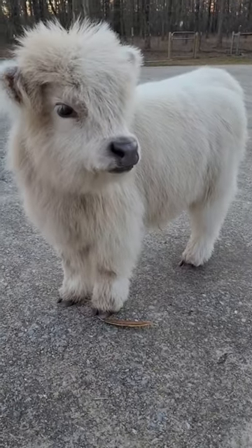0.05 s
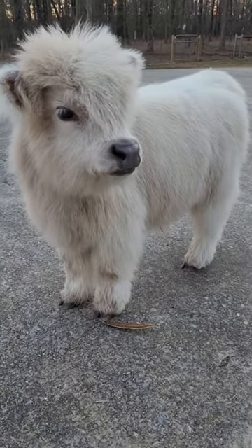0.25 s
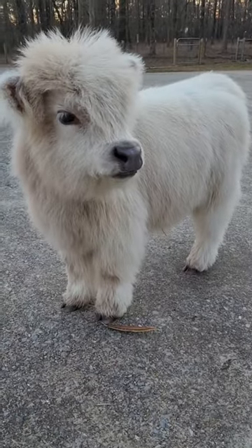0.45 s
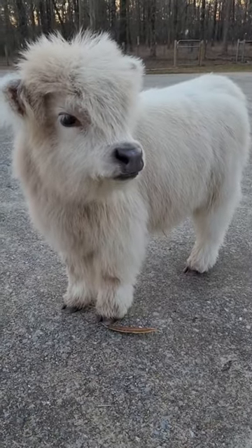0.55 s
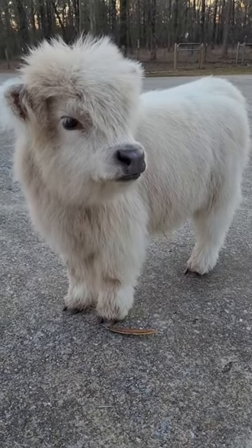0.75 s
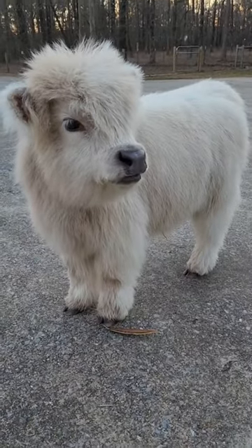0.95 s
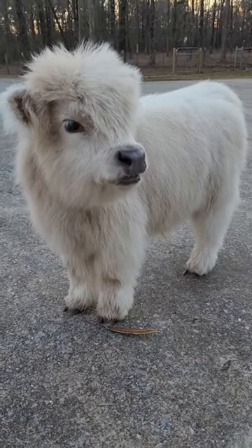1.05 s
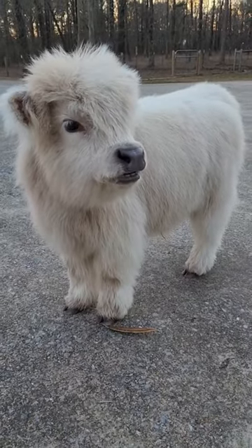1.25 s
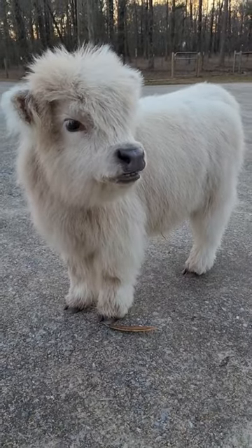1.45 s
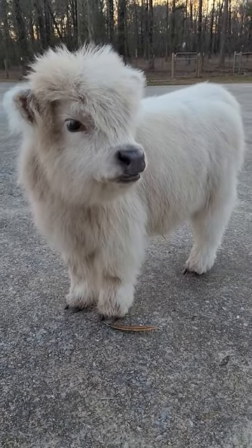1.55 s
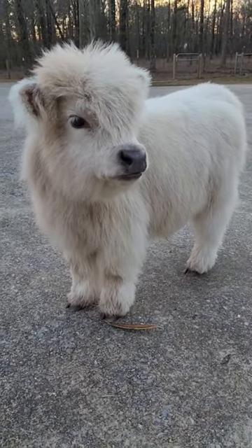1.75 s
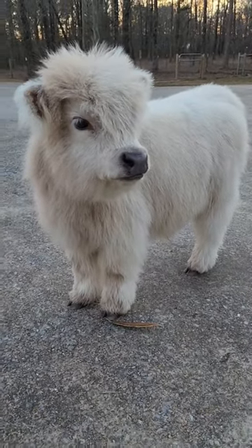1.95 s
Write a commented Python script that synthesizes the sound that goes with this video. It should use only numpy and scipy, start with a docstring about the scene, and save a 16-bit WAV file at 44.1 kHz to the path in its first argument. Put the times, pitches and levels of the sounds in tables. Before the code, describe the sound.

A calf moos once, close to the microphone, in a paved yard by a wood. A rising nasal hum opens into a louder, bright bleat, then drops in pitch and stops, leaving a faint low outdoor rumble.

```python
"""A paved yard at the edge of a wood, where a calf moos once, close by.
Its vocal folds send pulses through the throat: first a rising hum through the nose, then the lips part,
the mouth opens to a bright bleat, and the folds slacken into a slowing rattle. Ground and trees echo it.
Under it lie a low rumble and faint outdoor air; one tiny tick follows."""
import sys
import numpy as np
from scipy import signal
from scipy.fft import rfft, irfft, next_fast_len
from scipy.io import wavfile
from scipy.ndimage import map_coordinates

SR = 44100
rng = np.random.default_rng(int(sys.argv[2]) if len(sys.argv) > 2 else 0)


def digitize_waveform(pressure):
    """Quantize a signal to 16-bit integers and store it at the path in sys.argv[1].

    Rows of a 2-D input are taken as channels; values are limited to [-1, 1].
    """
    field = np.atleast_2d(pressure).T
    bounded = np.clip(field, -1, 1)
    quanta = np.round(bounded * 32767).astype(np.int16)
    wavfile.write(sys.argv[1], SR, quanta)


N = 88200
SIZE = 2048  # samples in the sound of one pulse

# how fast the vocal folds open and close: t/s, f/Hz
FOLD_RATE = [(0.0, 119.8), (0.028, 121.1), (0.35, 143.8), (0.452, 150.3), (0.662, 157.2), (0.698, 158.3),
             (0.81, 163.3), (0.904, 164.4), (1.02, 163.8), (1.14, 163.6), (1.234, 159.3), (1.262, 155.7),
             (1.3, 149.8)]
SLACK_S, END_S = FOLD_RATE[-1][0], 1.405  # the folds go slack, then stop


def amp(db):
    """Turn decibels into a number to multiply by."""
    return 10 ** (np.asarray(db) / 20)


def unit(x):
    """Scale a sound to an average power of 1."""
    return x / np.sqrt(np.mean(x ** 2) + 1e-20)


def along(points, hz):
    """Read between (frequency, value) points, with octaves evenly spaced."""
    freqs, values = np.transpose(points)
    return np.interp(np.log(hz + 1), np.log(freqs + 1), values)


def at(rows, t):
    """Read each column of a curve at the times t."""
    times, *columns = np.transpose(rows)
    return [np.interp(t, times, column) for column in columns]


def filtered(x, response):
    """Multiply each frequency in x by response(hz)."""
    size = next_fast_len(N + SR // 2)
    return irfft(rfft(x, size) * response(np.fft.rfftfreq(size, 1 / SR)), size)[:N]


def noise(colour):
    """Steady noise of power 1, shaped by (frequency, level) points."""
    return unit(filtered(rng.standard_normal(N), lambda hz: amp(along(colour, hz))))


def delay(hz, seconds):
    """A filter that makes a sound arrive later."""
    return np.exp(-2j * np.pi * hz * seconds)


def causal(gain):
    """Turn rows of gains into filters that ring only after a pulse (minimum phase)."""
    cepstrum = irfft(np.log(np.maximum(gain, 1e-6)))
    cepstrum[:, 1:SIZE // 2] *= 2
    cepstrum[:, SIZE // 2 + 1:] = 0
    return np.exp(rfft(cepstrum))


def ring(hz, centre, width, db):
    """The boost in dB from a resonance: air that rings around one frequency."""
    return 10 * np.log10(1 + (amp(db) ** 2 - 1) / (1 + (2 * (hz - centre) / width) ** 2))


def fold_pitch(t):
    """The rate of the vocal folds in Hz; it sags once they go slack."""
    sag_hz_per_s = 880
    return np.maximum(at(FOLD_RATE, t)[0] - sag_hz_per_s * np.maximum(t - SLACK_S, 0), 50)


def moo(t):
    """Each time the vocal folds close, they send a pulse and a puff of breath through the throat."""
    # how hard the calf calls: t/s, relative level/dB
    effort = [(0.0, -40.5), (0.324, -31), (0.596, -28.5), (0.682, -33.5), (0.788, -28), (0.816, -21),
              (0.922, -18), (1.212, -19), (1.318, -20), (1.374, -33), (1.41, -47.5)]
    # hoarseness: t/s, breath level against the pulse/dB, timing scatter/ms
    roughness = [(0, -15, .02), (.3, -16, .012), (.6, -19, .006), (.9, -23, .003), (1.12, -22, .004),
                 (1.22, -19, .01), (1.3, -15, .025), (1.4, -6, .2)]
    # colour of the breath: f/Hz, level/dB
    breath_colour = [(150, -13), (600, -7), (1500, 0), (3000, 2), (9000, 6)]
    voice_db, shimmer_db, puff_decay_s = -0.5, .2, .004
    lead = 192  # samples of room before each pulse for its soft start
    hz = np.fft.rfftfreq(SIZE, 1 / SR)
    pitch = fold_pitch(t)
    cycles = np.cumsum(pitch) / SR
    times = np.interp(np.arange(1, cycles[-1]), cycles, t)  # one pulse per cycle
    times = times[times < END_S]
    chance = rng.standard_normal((300, SIZE + 2))[:len(times)]
    jitter, shimmer, hiss = chance[:, 0], chance[:, 1], chance[:, 2:]
    breath_db, jitter_ms = at(roughness, times)
    starts = np.maximum(times + jitter_ms * jitter / 1000, 0) * SR
    pulses = -delay(hz, (starts % 1)[:, None] / SR)  # a pulse can fall between two samples
    fade = np.exp(-t[:SIZE] / puff_decay_s)
    puffs = rfft(hiss * fade / np.linalg.norm(fade)) * amp(breath_db[:, None] + along(breath_colour, hz))
    strength = amp(at(effort, times)[0] + voice_db + shimmer_db * shimmer)
    strength *= np.sqrt(SR / np.interp(times, t, pitch))  # equal power at any pitch
    spectra = (pulses + puffs) * delay(hz, lead / SR) * throat(times, hz) * head_cavities(times, hz)
    waves = irfft(spectra) * strength[:, None]
    places = starts.astype(int)[:, None] + np.arange(SIZE)
    return np.bincount(places.ravel(), waves.ravel(), N + lead)[lead:N + lead]  # add up the pulses


def throat(times, hz):
    """Throat and mouth colour each pulse as they move from one shape to the next."""
    # colour of each mouth shape: f/Hz, relative level/dB
    nose = [(150, -18), (240, -20.5), (310, -16), (420, -14), (600, -3.5), (800, -6.5), (1200, -14),
            (1540, -16.5), (1690, -9), (1980, -33), (2430, -13), (2700, -19.5), (3150, -2.5), (3550, -12.5),
            (3900, -20.5), (4950, -23), (5350, -58.5), (5750, -33.5), (6300, -34.5), (7050, -20.5),
            (7500, -25.5), (8500, -24), (9300, -34.5), (11000, -55)]
    parting = [(76, -26), (130, 2.5), (167, 3), (308, -13), (482, 0.5), (631, -15), (826, -10.5),
               (1180, -26), (1630, -13), (1790, -4), (2100, -34.5), (3230, -4.5), (3870, -16.5),
               (4630, -18), (5250, -34.5), (7130, -30.5), (9500, -33.5), (12400, -60.5), (20900, -120)]
    parted = [(76, -24), (130, 0), (322, -7), (481, -25), (667, -6.5), (892, -30), (1330, 0), (1540, -9),
              (1910, -45), (2340, -16), (2800, -22), (3300, -8), (4660, -38), (5200, -39.5), (6120, -38),
              (7080, -28), (10000, -45.5), (13000, -77.5), (22000, -120)]
    half_open = [(76, -29.5), (130, -6), (337, 1), (491, -23.5), (812, -13), (1060, -14.5), (1230, 5.5),
                 (1340, -0.5), (1690, 6), (1920, -24), (2260, 6.5), (2750, -20.5), (3290, -4),
                 (3800, -32.5), (4310, -9.5), (4980, -34), (6520, -15.5), (7130, -41.5), (9500, -35.5),
                 (12400, -80.5), (20900, -120)]
    wide_open = [(160, 4.5), (330, 0), (500, -0.5), (660, 2), (850, -11), (1150, -7.5), (1600, -6),
                 (2300, -6), (3000, -12.5), (3500, -20), (3850, -13.5), (5000, -15), (6300, -13.5),
                 (7300, -14), (8500, -19), (9500, -41.5)]
    closing = [(150, -15.5), (300, -10), (600, -5), (850, -14.5), (1500, -2.5), (2300, -9.5), (3400, -12),
               (4300, -12.5), (5100, -18.5), (6400, -15.5), (8000, -23), (9500, -38)]
    # sharp peaks and dips of three of the shapes: f/Hz, width/Hz, boost/dB
    nose_rings = [(1582, 110, 14), (2935, 360, -8)]
    open_rings = [(1279, 40, 22.5), (1769, 77, 12.5), (2581, 42, 23.5), (3121, 25, 21.5), (4170, 250, 15),
                  (5510, 240, 8), (6900, 70, 10.5)]
    closing_rings = [(449.5, 51, 20.2), (1285.7, 90, 4.8), (1800, 200, 6.3), (2650, 170, 16),
                     (4620, 530, 8)]
    # lips loosen, lips part, mouth half opens, opens wide, closes: midpoint t/s, length/s
    moves = [(0.659, 0.04), (0.696, 0.066), (0.8, 0.015), (0.851, 0.1), (1.238, 0.16)]
    shapes = [(nose, nose_rings), (parting, []), (parted, []), (half_open, []),
              (wide_open, open_rings), (closing, closing_rings)]
    colours = [along(base, hz) + sum(ring(hz, *row) for row in rings) for base, rings in shapes]
    t, db = times[:, None], colours[0]
    for (midpoint, length), colour in zip(moves, colours[1:]):
        progress = np.clip((t - midpoint) / length + .5, 0, 1)
        db = db + progress * (colour - db)
    # as the lips part, a resonance slides down with a dip below it
    slide_s, slide_length_s, slide_hz_per_s = .68, .025, 7500
    slide = np.exp(-((t - slide_s) / slide_length_s) ** 2)
    centre_hz = 1730 - slide_hz_per_s * (t - slide_s)
    db += ring(hz, centre_hz, width=140, db=11 * slide)
    db -= ring(hz, centre_hz - 480, width=160, db=11 * slide)
    # slack folds close softly, so the treble fades first
    dull_db_per_s = 67.5 * np.log2(1 + hz / 2050)
    db -= dull_db_per_s * np.maximum(t - SLACK_S, 0)
    bass_cut_hz = 250
    gain = amp(np.maximum(db, -70)) / np.sqrt(1 + (bass_cut_hz / (hz + 1)) ** 12)
    power = np.mean(gain ** 2 * (hz > bass_cut_hz), axis=1, keepdims=True)
    return causal(gain / np.sqrt(power))  # every shape is equally strong


def head_cavities(times, hz):
    """Side cavities of the head spread each pulse in time and put ripples in its colour."""
    # scatter of travel time through the head: f/Hz, typical delay/ms
    smear = [(100, -2.5), (600, 1.8), (1300, 2), (2400, 5.5), (4500, 2.7), (9000, 2.7)]
    # how much the colour wavers: f/Hz, depth/dB
    waver = [(300, 4.95), (1500, 0.97), (4000, 2.5), (9000, 5)]
    step_hz, step_s = 260.1, 0.08995  # spacing of the random grid
    grid = rng.standard_normal((120, 400))
    scatter = np.abs(map_coordinates(grid[-1], [hz / step_hz], mode="mirror"))
    delay_s = along(smear, hz) * scatter / 1000
    spread = np.exp(-2j * np.pi * np.cumsum(delay_s) * hz[1])
    places = np.meshgrid(times / step_s, hz / step_hz, indexing="ij")
    ripple = map_coordinates(grid, places, mode="mirror")
    return causal(amp(along(waver, hz) * ripple)) * spread


def chest(t):
    """Chest and throat give off a soft, clean tone at the pitch of the voice."""
    # strength of the tone: t/s, level/dB
    loudness = [(0, -40.5), (.2, -42.5), (.33, -37), (.56, -33.5), (.76, -32.5), (.88, -38.5),
                (1.24, -38.5), (1.32, -43.5), (1.38, -77)]
    tone = unit(-np.cos(2 * np.pi * np.cumsum(fold_pitch(t)) / SR))
    return amp(at(loudness, t)[0]) * (t < END_S) * tone


def background():
    """A steady low rumble and faint outdoor air."""
    # colour of each noise: f/Hz, relative level/dB
    rumble = [(24, -42), (40, -1.5), (92, -3), (110, -1.5), (156, -16.5), (216, -24), (249, -43),
              (280, -63.5), (297, -38), (400, -43), (520, -59.5), (880, -120)]
    air = [(180, -36), (300, -6), (358, -11.5), (625, -20), (663, -13.5), (779, -17.5), (1320, -21.5),
           (2830, -37), (5320, -33), (10000, -63), (13000, -95), (22000, -120)]
    return amp(-41) * noise(rumble) + amp(-64.5) * noise(air)


def near_bounces(voice):
    """The voice bounces off the pavement and the calf's own side."""
    # the two bounces: delay/s, level/dB
    bounces = [(.0021, -16), (.0039, -12.5)]
    return filtered(voice, lambda hz: sum(amp(db) * delay(hz, seconds) for seconds, db in bounces))


def yard_echo(voice):
    """Ground and trees return a soft wash of echoes; each frequency dies at its own speed."""
    # how long the yard rings: f/Hz, time to fade by 60 dB/s
    fade_times = [(200, 0.19), (1500, 0.42), (8000, 0.27)]
    hz, t, hiss = signal.stft(rng.standard_normal(SR * 3 // 4), SR, nperseg=256)
    fade = amp(-60 * t / along(fade_times, hz)[:, None])
    tail = signal.istft(hiss * fade, SR, nperseg=256)[1]
    return amp(-26) * signal.fftconvolve(voice, tail / np.linalg.norm(tail))[:N]


def tick(t):
    """One faint, dry tick: a burst of bright noise that dies at once."""
    # colour of the tick: f/Hz, relative level/dB
    colour = [(1000, -25), (2500, -9), (4600, 2), (5600, -12), (6700, 1), (8000, -18), (10000, -30)]
    start_s, decay_s = 1.845, .003
    age = t - start_s
    return amp(-56) * noise(colour) * (age > 0) * np.exp(-np.abs(age) / decay_s)


def scene():
    """The calf, the background, the echoes and the tick, in one channel."""
    t = np.arange(N) / SR
    voice = moo(t)
    return (voice + chest(t) + background() + near_bounces(voice) + yard_echo(voice) + tick(t))[None]


def record(dry):
    """Cut away the highest treble."""
    top_hz = 10150
    return filtered(dry[0], lambda hz: hz < top_hz)[None]


dry = scene()
out = record(dry)
digitize_waveform(out)
```